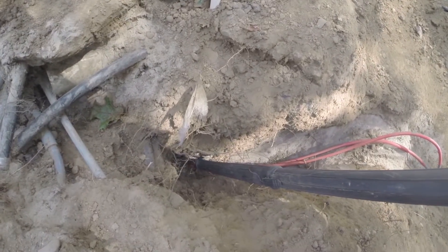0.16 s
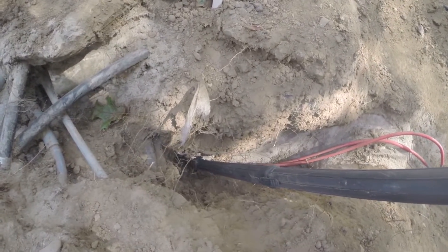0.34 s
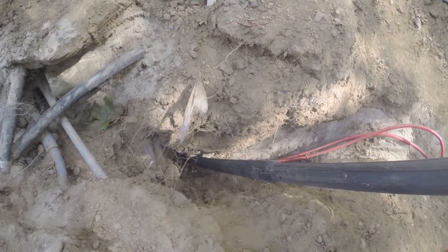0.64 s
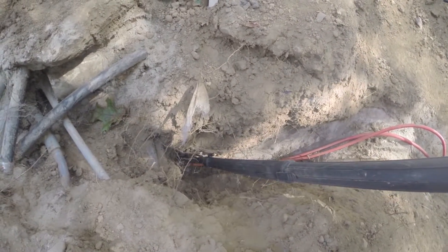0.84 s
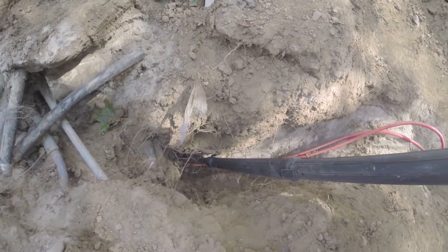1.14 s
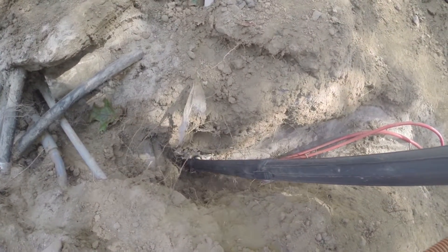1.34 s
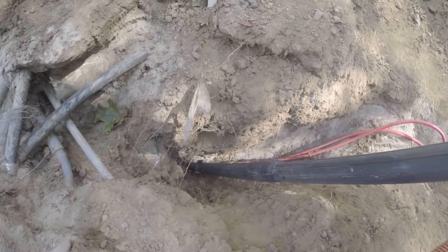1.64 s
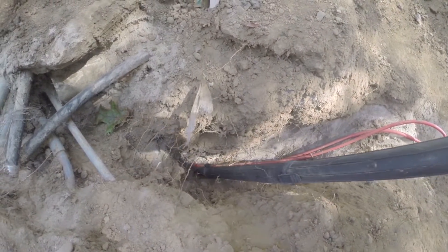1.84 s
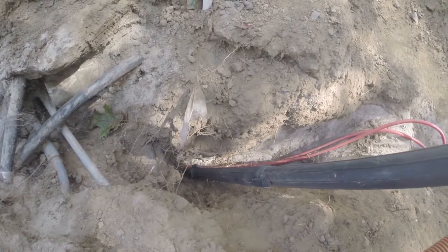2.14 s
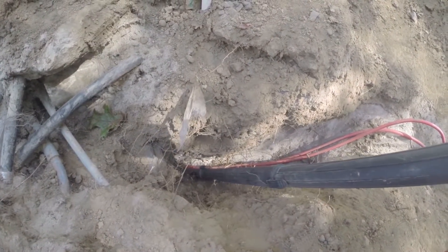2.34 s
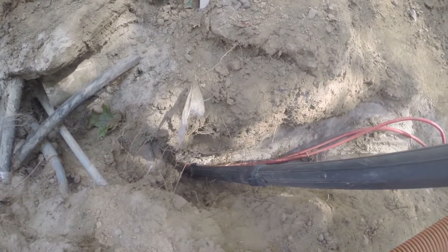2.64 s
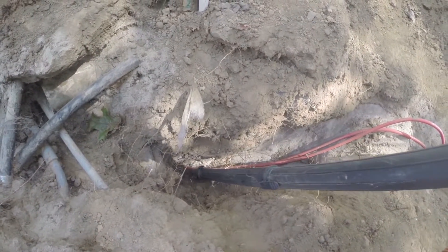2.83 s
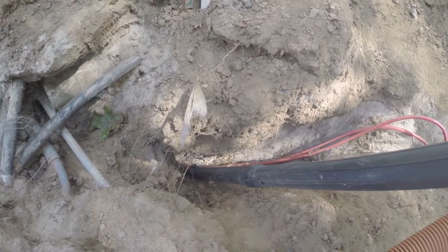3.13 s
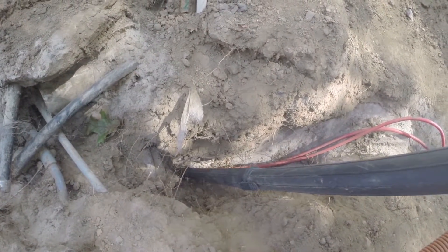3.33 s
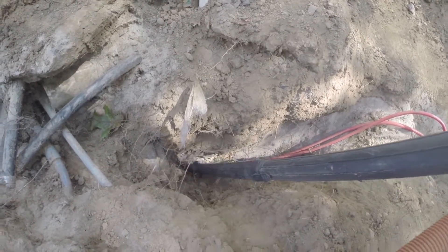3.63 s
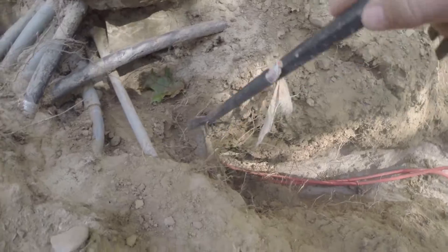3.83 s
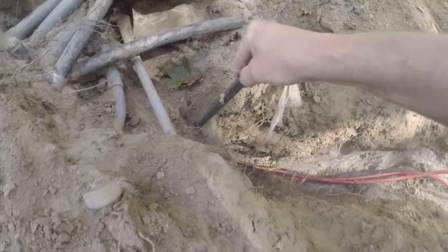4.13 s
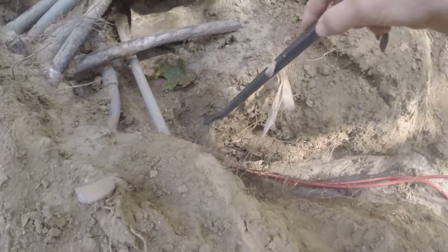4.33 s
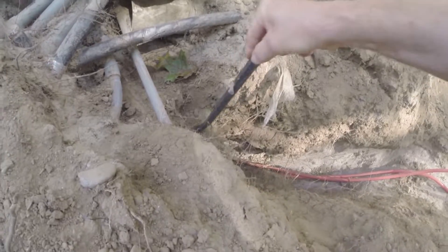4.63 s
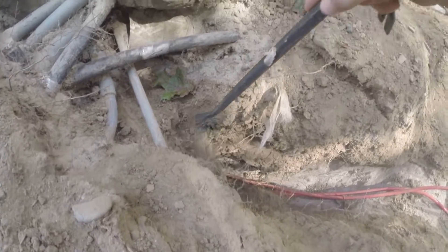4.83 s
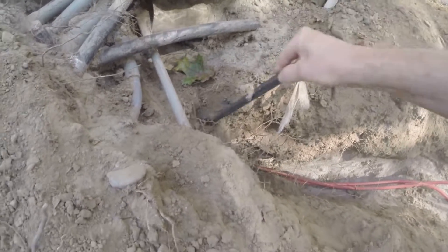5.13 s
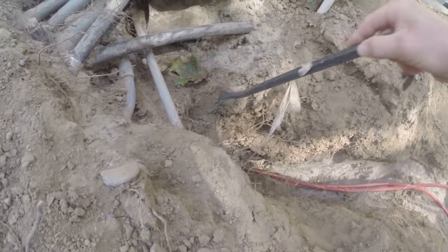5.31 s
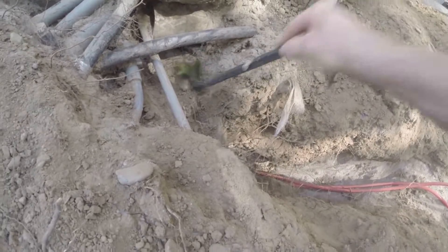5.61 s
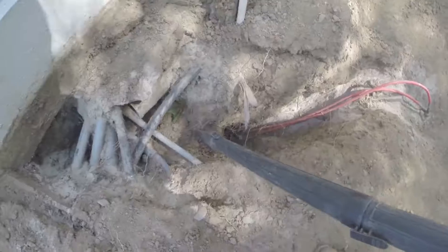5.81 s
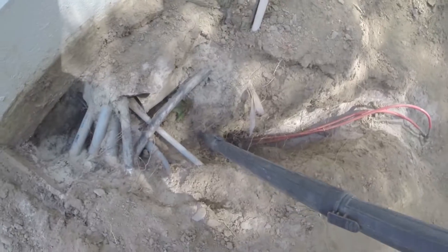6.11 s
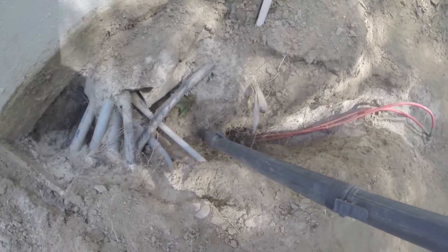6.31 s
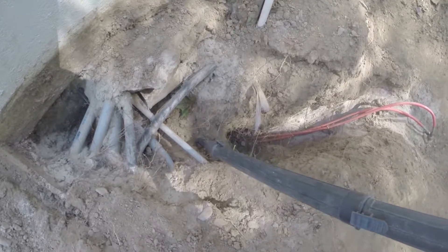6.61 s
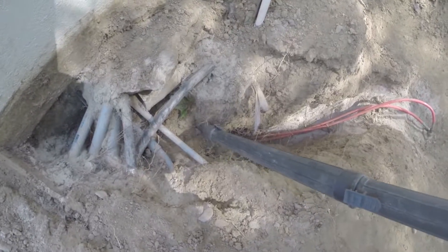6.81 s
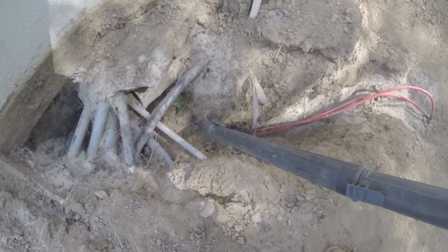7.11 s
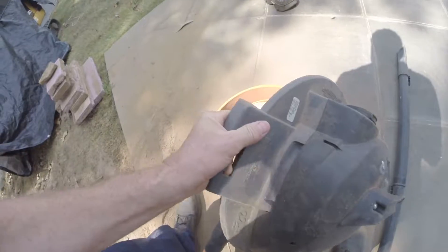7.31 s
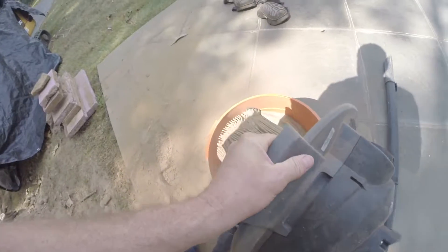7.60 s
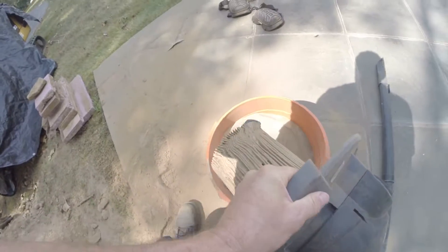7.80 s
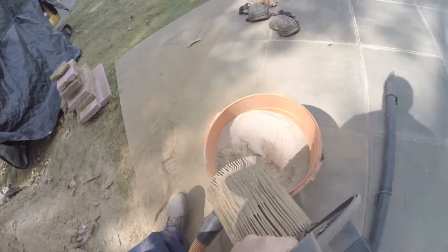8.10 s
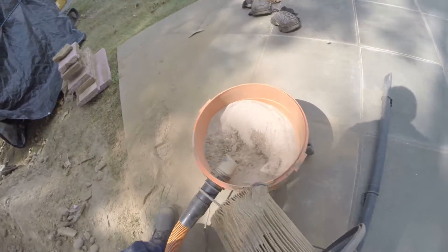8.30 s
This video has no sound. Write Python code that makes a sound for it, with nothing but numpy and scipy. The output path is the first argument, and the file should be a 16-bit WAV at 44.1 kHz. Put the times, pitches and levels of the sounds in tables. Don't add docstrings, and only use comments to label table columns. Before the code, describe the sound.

A shop vacuum whines steadily while grit and stones rattle up its tube, a steel bar chips soil, then plastic knocks and scrapes in quiet air.

```python
import sys
import numpy as np
from scipy import signal
from scipy.fft import rfft, irfft, next_fast_len
from scipy.io import wavfile
from scipy.ndimage import uniform_filter1d, map_coordinates

SR = 44100
rng = np.random.default_rng(int(sys.argv[2]) if len(sys.argv) > 2 else 0)


def volts_from_decibels(level):
    exponent = np.asarray(level, float) / 20
    return 10 ** exponent


def log_audio(samples):
    frames = np.atleast_2d(samples).T
    limited = np.clip(frames, -1, 1)
    pcm = np.round(limited * 32767).astype(np.int16)
    wavfile.write(sys.argv[1], SR, pcm)


N = 372689
T = np.arange(N) / SR

# start in seconds, end in seconds.
SPOTS_S = [
    (0, 3.7478),
    (3.7598, 5.8498),
    (5.8615, 7.2513),
]
# frequency in Hz, level in dB per Hz.
YARD_DB_PER_HZ = [(12, -30), (20, -8), (38, -9), (87, -10), (207, -13), (649, -34), (811, -31), (2540, -40),
                  (3350, -34), (12500, -51.5), (15500, -60)]
# frequency in Hz, gain in dB.
MIC_DB = [(20, -5), (7000, -0.5), (10000, -10), (15000, -24), (15600, -42)]


def running():
    # time in seconds, shaft speed in Hz, draw at the nozzle in dB.
    motor = [
        [(0.0, 530.4, -2.5), (0.06, 537.4, 0), (0.6, 538, -1), (0.84, 538.5, 1.5), (1.0, 539, -0.5),
         (1.46, 537, -1), (2.1, 537, 0), (2.38, 536.5, 2.5), (2.84, 538, 1), (2.93, 539.6, 2),
         (3.4, 544.5, -1.5)],
        [(3.95, 525.7, -0.5), (4.5, 525.7, -1), (5.1, 525.7, -0.5), (5.6, 525.7, -1.5)],
        [(6.1, 525.3, -6.5), (6.4, 529, 0), (6.69, 533, 1.5), (6.98, 533, -0.5), (7.16, 535, 1.5)],
    ]
    # whine in dB, hose rumble at rest in dB over the whine.
    level_db = [(-18, -19.5), (-17.5, -24.5), (-16, -16.5)]
    # frequency in Hz, level in dB per Hz.
    roar_db_per_hz = [
        [(90, -32), (150, -16), (470, -12.5), (1060, -7.5), (1700, -20), (2860, -34), (5000, -36.5),
         (6600, -25.5), (8000, -39), (10000, -52), (12000, -63), (15200, -69)],
        [(90, -76), (150, -24), (350, -4.5), (570, -11.5), (1020, -5), (1500, -18.5), (2900, -26.5),
         (5000, -29), (6600, -30), (8800, -35), (9500, -40), (11000, -43), (12000, -54.5), (15200, -64)],
        [(90, -67), (150, -21), (245, -0.5), (570, -6), (1150, 1), (1500, -16), (2310, -16), (3100, -25),
         (4600, -45), (6470, -27), (8000, -37), (9500, -41), (11500, -42), (15200, -65)],
    ]
    # casing resonance depth (1 is full), roar in dB, suction in dB, grit in grains per second, grit
    # in dB.
    place = [
        (0.602, -8.5, -6.5, 600, -8.5),
        (1, -5, -35, 10, -2),
        (1.1, -10, -5.5, 600, -7.5),
    ]
    # multiple of the shaft speed, level in dB over the whine.
    orders = [
        [(2, -15.5), (3, -36), (12, -27)],
        [(2, -12), (3, -20), (5, -31), (7, -30.5), (8, -31), (12, -30)],
        [(2, -21.5), (3, -34.5)],
    ]
    # frequency in Hz, width in Hz, gain in dB.
    local = [
        [(5610, 110, 4), (6480, 89, 4.5), (6790, 360, -7.5), (7110, 180, 6.5), (12600, 790, 5)],
        [(1810, 120, -5), (3270, 110, 5.5), (3600, 200, 2), (3800, 100, -2), (3955, 60, 6), (4950, 200, 0.5),
         (5680, 66, -1), (6020, 200, -1), (6480, 200, 3), (5620, 120, -4), (6800, 200, -3), (4750, 120, -4),
         (8930, 600, 2), (9600, 500, -8), (10700, 350, 6.5), (11600, 500, -5), (12300, 500, 2)],
        [(4100, 100, -1), (6480, 230, 4), (10540, 640, 6.5), (11700, 400, 3), (12800, 700, 5)],
    ]
    arm_share = [0, .47, 0]
    out = np.zeros(N)
    for (start_s, end_s), *spot in zip(SPOTS_S, motor, level_db, roar_db_per_hz, place, orders, local, arm_share):
        t = T[round(start_s * SR):round(end_s * SR)]
        fade = np.clip((t - start_s) / 0.009, 0, 1) ** 0.9 if start_s else 1
        add(out, start_s, fade * vacuum(t, *spot))
        add(out, end_s, volts_from_decibels(-21) * np.array([1, -1]))
    return out


def vacuum(t, motor, level_db, roar_db_per_hz, place, orders, local, arm_share):
    shaft_hz, draw_db = curves(motor, t)
    depth, roar_db, suck_db, grit_per_s, grit_db = place
    whine_db, rest_db = level_db
    mix = shaft(shaft_hz, draw_db, orders)
    mix = mix + fan(t, draw_db, roar_db, roar_db_per_hz, depth, local, arm_share)
    mix = mix + suction(draw_db, suck_db, grit_per_s, grit_db, local)
    mix = mix + hose(t, draw_db, rest_db)
    return volts_from_decibels(whine_db + ducking(t)) * mix


def shaft(shaft_hz, draw_db, orders):
    n = len(shaft_hz)
    turn = 2 * np.pi * np.cumsum(shaft_hz + 0.3 * wobble(25.4, n)) / SR
    whine = np.sqrt(2) * volts_from_decibels(0.07 * wobble(31.04, n) + 0.37 * wobble(4.54, n)) * np.cos(turn)
    for k, db in orders:
        yield_db = 1.9 * draw_db if k == 3 else 0
        sway_db = np.sqrt(k - 1) * (0.8 * wobble(16, n) + 0.9 * wobble(4, n))
        phase = round(k) * (turn + 0.04 * wobble(29.87, n))
        whine = whine + np.sqrt(2) * volts_from_decibels(db - yield_db + sway_db) * np.cos(phase)
    return whine


def fan(t, draw_db, roar_db, roar_db_per_hz, depth, local, arm_share):
    n = len(t)
    noise = patchy(n, patchy_db=0.75, drift_db=1.5)
    roar = mirrored(coloured(noise, roar_db_per_hz, depth, local), t, arm_share)
    return volts_from_decibels(roar_db - 0.8 * draw_db + 0.5 * wobble(7.57, n)) * roar


def suction(draw_db, suck_db, grit_per_s, grit_db, local):
    # frequency in Hz, level in dB per Hz.
    suck_db_per_hz = [(350, -17), (670, -0.5), (1170, 2), (1660, -10), (2160, -5), (2790, -13.5),
                      (3570, -10.5), (6580, -12.5), (7540, -17.5), (10400, -25.5), (12500, -37.5),
                      (15200, -41)]
    n = len(draw_db)
    hiss = patchy(n, patchy_db=1.57, drift_db=0.7) * volts_from_decibels(0.5 * wobble(90, n))
    grit = volts_from_decibels(grit_db + 0.57 * draw_db) * sand(n, grit_per_s)
    air = coloured(hiss + grit, suck_db_per_hz, 0.49, local)
    return volts_from_decibels(suck_db + draw_db + 0.067 * wobble(11.8, n)) * air


def hose(t, draw_db, rest_db):
    # frequency in Hz, level in dB per Hz.
    hose_db_per_hz = [(12, -46), (20, -9.5), (70, 0.5), (113, 2.5), (248, -8), (289, -29), (400, -6.5),
                      (520, -14.5), (880, -120)]
    # time in seconds, rumble in dB over the whine.
    clods = [(0.0, -31), (0.09, -18), (0.35, -9), (0.5, -10), (0.66, -12), (0.85, -10.5), (0.98, -10.5),
             (1.1, -16), (1.9, -17), (2.11, -10), (2.32, -14), (2.47, -10), (2.63, -6), (2.76, -8.5),
             (2.95, -15), (3.04, -3.5), (3.27, -7), (3.53, -16), (3.74, -9), (3.78, -18), (4.13, -15),
             (4.575, -20), (5.05, -15), (5.725, -16), (6.26, -7.5), (6.49, -7.5), (6.69, -9.5), (7.02, -10),
             (7.21, -19)]
    fall_db_per_s = 112
    clods_db = np.max([db - fall_db_per_s * np.abs(t - s) for s, db in clods], axis=0)
    rumble_db = np.maximum(rest_db + 1.3 * draw_db, clods_db)
    noise = rng.standard_normal(len(t)) * volts_from_decibels(2.1 * wobble(14, len(t)))
    return volts_from_decibels(rumble_db - 3.0) * coloured(noise, hose_db_per_hz)


def mirrored(x, t, share):
    # time in seconds, notch frequency in Hz.
    arm = [(3.76, 6700), (3.92, 6600), (4.2, 7000), (4.52, 7700), (4.7, 7300), (5.02, 8100), (5.2, 7250),
           (5.6, 7050), (5.85, 7450)]
    late = 6.5 * SR / curves(arm, t)[0]
    treble = filtered(x, lambda hz: np.exp(-((hz - 7200) / 1700) ** 4))
    return x + share * map_coordinates(treble, [np.arange(len(x)) - late])


def ducking(t):
    # time in seconds, depth in dB.
    ducks = [
        (0.1, 1),
        (3.76, 2),
        (4.565, 3),
        (5.74, 0.5),
        (5.86, 9),
        (6.473, 6.5),
        (6.82, 2),
    ]
    recover_s = 0.4
    since = [(t - s, depth_db) for s, depth_db in ducks]
    return -np.max([depth_db * np.exp(-np.abs(u) / recover_s) * (u >= 0) for u, depth_db in since], axis=0)


def wand():
    # time in seconds, peak in dB, pitch in Hz, T60 in seconds.
    stones = [(0.1002, -4.5, 3900, 0.013), (0.1328, -5, 4730, 0.0064), (0.6918, -4, 3530, 0.01),
              (0.8271, -16, 3080, .019), (0.8578, -10, 3360, 0.018), (1.0202, -4, 1950, 0.013),
              (1.163, -12, 5200, 0.018), (1.2291, -9.5, 3100, .008), (1.2342, -2, 2160, 0.0055),
              (1.7088, -7, 2340, 0.0086), (1.8626, -9, 2190, 0.017), (1.8752, -7, 9230, .01),
              (2.3365, -7, 3903, .01), (2.349, -9, 4000, .008), (2.3531, -8, 3700, .008),
              (2.407, -3, 2220, 0.0035), (2.519, -11, 11510, .008), (2.749, -10, 2500, .006),
              (2.9095, -3, 1900, 0.006), (2.9597, -1.5, 2580, 0.011), (2.9638, -5, 2800, .012),
              (2.969, -8.5, 3020, .014), (6.368, -8, 2100, .01), (6.4508, -3, 1926, 0.011),
              (6.4672, 2, 1300, 0.01), (6.4768, -1.5, 1650, 0.008), (6.5046, -9, 2160, 0.029),
              (6.5929, -11, 2080, 0.014), (6.6847, -11, 2170, .026), (6.7047, -2.5, 2030, 0.018),
              (6.74, -7, 2570, 0.0085), (6.781, -13, 9500, .006), (6.8435, -13, 10000, .008),
              (6.849, -10, 11000, .01), (6.8805, -6, 3430, 0.018), (6.886, -8, 3630, .02),
              (6.691, -12, 2070, .012), (6.514, -12, 2300, .012), (6.915, -12, 2300, .012)]
    # time in seconds, peak in dB, pitch in Hz.
    ticks = [(0.0234, -13, 3100), (0.072, -31, 10000), (0.0756, -28, 10300), (0.2149, -16, 3800),
             (0.2341, -18, 3400), (0.241, -33, 10300), (0.2743, -18, 3400), (0.2929, -29, 10700),
             (0.3089, -25, 10000), (0.3278, -9, 2100), (0.4145, -17, 2400), (0.4708, -31, 10000),
             (0.4863, -21, 10000), (0.7, -33, 10300), (0.7686, -9, 3100), (1.0011, -10, 5200),
             (1.0679, -17, 2800), (1.1252, -36, 10700), (1.2547, -19, 2800), (1.2678, -15, 7600),
             (1.2736, -31, 8600), (1.677, -37, 11700), (1.75, -12, 2400), (1.8196, -9, 4100),
             (1.9398, -37, 11400), (2.0293, -33, 10000), (2.1182, -17, 4100), (2.2308, -11, 5900),
             (2.2604, -11, 3800), (2.2902, -25, 10300), (2.341, -22, 8300), (2.3475, -14, 8300),
             (2.3595, -17, 8300), (2.3981, -17, 10000), (2.4284, -15, 3100), (2.4502, -34, 12100),
             (2.4952, -34, 11700), (2.5757, -29, 10300), (2.6412, -28, 10000), (2.7137, -28, 10300),
             (2.7698, -21, 8300), (2.7773, -21, 8300), (2.9723, -22, 8300), (3.0242, -7.5, 5200),
             (3.066, -23, 7610), (3.1028, -11, 4100), (3.389, -20, 9600), (3.432, -14, 4100),
             (6.4085, -20, 9600), (6.4201, -20, 7900), (6.4277, -23, 9300), (6.456, -20, 4100),
             (6.509, -15, 3100), (6.6508, -9, 2400), (6.926, -12, 2400), (7.091, -11, 5400),
             (7.135, -11, 5600), (7.24, -20, 4500)]
    # time in seconds, peak in dB, pitch in Hz.
    flicks = [(0.0235, -7, 5500), (0.108, -14, 5500), (0.3746, -11, 1200), (0.7014, -10, 1200),
              (2.016, -11, 1200), (2.041, -12, 1200), (2.428, -9, 1200), (0.1158, -16, 2900),
              (0.2988, -14, 2100), (0.4505, -21, 3400), (0.713, -12, 2100), (0.8271, -8, 5400),
              (0.8401, -15, 3500), (0.938, -16, 2100), (1.0172, -11, 5400), (1.058, -17, 3400),
              (1.075, -18, 3400), (1.136, -16, 2100), (1.175, -11, 5000), (1.3554, -16, 3495),
              (1.585, -15, 2100), (1.7894, -15, 4300), (1.9316, -13, 2300), (2.0947, -14, 3400),
              (2.0967, -9, 2100), (2.193, -12, 5500), (2.244, -15, 3200), (2.309, -14, 4870),
              (2.3536, -16, 2100), (2.444, -12, 1990), (2.4504, -13, 2100), (2.666, -10, 2100),
              (2.685, -14, 3500), (2.8296, -17, 3400), (2.9505, -14, 3200), (2.9782, -11, 2100),
              (3.034, -11, 3900), (3.1184, -13, 3500), (3.725, -14, 2104), (3.919, -15, 3220),
              (6.291, -16, 2100), (6.354, -18, 3400), (6.5825, -18, 3400), (6.676, -12, 2100),
              (6.7352, -11, 2800), (7.112, -11, 2100)]
    out = np.zeros(N)
    fall_db = 60 * np.arange(SR // 100) / SR / 0.006
    for s, db, hz, t60_s in stones:
        ring = ping(hz, t60_s, rough=1.5)
        ring = ring + volts_from_decibels(-7) * ping(min(1.6 * hz, 12000), 0.7 * t60_s, rough=3.0)
        ring = ring + volts_from_decibels(-9) * ping(0.62 * hz, 0.6 * t60_s, rough=2.5)
        add(out, s, volts_from_decibels(db - 3.5) * ring)
        burst_db = db - 18.0 + 5.4 * np.log2(hz / 2000) - fall_db
        add(out, s, volts_from_decibels(burst_db) * rng.standard_normal(len(fall_db)))
    for s, db, hz in flicks:
        add(out, s, volts_from_decibels(db - 11 - 2 * fall_db) * rng.standard_normal(len(fall_db)))
    out = through_mic(out)
    tick_t60_s = 0.0071
    for s, db, hz in ticks + flicks:
        ring = ping(hz, tick_t60_s, rough=1.3) + volts_from_decibels(-6) * ping(0.7 * hz, tick_t60_s, rough=2.4)
        add(out, s, volts_from_decibels(db - 4.5) * ring)
    return out


def bar():
    # time in seconds, peak in dB, pitch in Hz, T60 in seconds, thud in dB.
    blows = [(3.702, -14, 1570, 0.0078, -11), (3.723, -33, 260, 0.018, -46.5),
             (4.106, -6.5, 1100, 0.017, -19), (4.11, -16, 2190, 0.053, -40), (4.1, -15, 4700, 0.012, -30),
             (4.5572, -20, 750, .012, -42), (3.9, -14, 350, 0.015, -40), (4.558, -26, 9900, .01, -45),
             (4.5568, 1.5, 553, 0.0073, -21), (5.046, -34, 300, 0.022, -19),
             (5.7072, -6.5, 3520, 0.031, -18), (5.7105, -14, 1120, .03, -45), (5.717, -21, 5400, .04, -45),
             (5.705, -13, 11760, 0.034, -40), (5.706, -11.5, 6640, 0.045, -29),
             (5.705, -13.5, 1990, .03, -43), (5.7205, -15, 2050, .04, -24)]
    out = np.zeros(N)
    for s, db, hz, t60_s, thud_db in blows:
        add(out, s, volts_from_decibels(db) * ping(hz, t60_s, rough=hz / 4000))
        add(out, s + 0.0076, volts_from_decibels(thud_db) * ping(135, 0.027, rough=0.13))
    return through_mic(out)


def knocks():
    # time in seconds, peak in dB, boom in dB, click in dB, ring time as a multiple of the T60.
    hits = [(7.438, -38, -14, -12, .4), (7.465, -26, -10, -17, 0.48), (7.477, -33, -14, -19, .3),
            (7.484, -20, -21, -16, .35), (7.505, -38, -11, -18, .4), (7.523, -29, -10, -18, 0.45),
            (7.589, -33, -8, -18, .5), (7.614, -24, -15, -16, 0.63), (7.627, -31, -8, -22, .4),
            (7.6445, -8, -17, -21, .85), (7.6508, -23.5, 1.5, -34, 1.1), (7.654, -27, 1, -34, 1.4),
            (7.657, -15, -14, -26, 0.71), (7.672, -21, -12, -24, .5), (7.676, -17, -16, -26, .5),
            (7.681, -19, -9, -26, .6), (7.689, -25, -14, -24, .5), (7.899, -27, 6, 12, 0.38),
            (7.9028, -28, -6, 24, 0.68), (7.907, -29, -6, 20, .7), (7.911, -31, -8, 22, .6),
            (7.933, -34, -10, 22, .6), (7.9415, -30, -10, 24, .5), (7.951, -35, -14, 26, .6),
            (7.964, -19, -22, 3, 0.44), (8.26, -17, -18, 1, 0.3), (8.263, -27, -18, 4, .3),
            (8.29, -27, -22, -14, .6), (8.299, -25, -16, -14, .5), (8.328, -26, -18, -10, .5),
            (8.353, -20, -22, -12, .6), (8.3795, -15, -19, 1, .25), (8.383, -10, -19, -5, 0.41),
            (8.392, -11.5, -16, -12, 0.36), (8.401, -20, -20, 6, .4), (8.405, -21, -25, 9, .3),
            (8.421, -28, -16, -12, .4), (8.439, -35, -14, -5, .4)]
    # frequency in Hz, level in dB, T60 in seconds.
    bucket = [
        (317, 0, 0.076),
        (720, -8, 0.052),
        (973, 0, 0.049),
        (1050, -12, 0.045),
        (1650, -16, .03),
    ]
    out = np.zeros(N)
    boom_hz, _, boom_t60_s = bucket[0]
    for s, db, boom_db, click_db, free in hits:
        ring = volts_from_decibels(boom_db - 2.0) * ping(boom_hz, free * boom_t60_s, rough=0.09)
        for hz, mode_db, t60_s in bucket[1:]:
            ring = ring + volts_from_decibels(mode_db - 10.0 + rng.normal(0, 1.1)) * ping(hz, free * t60_s, rough=0.45)
        click = volts_from_decibels(click_db - 9.0) * ping(2270, 0.049 * free, rough=0.98)
        add(out, s, volts_from_decibels(db) * (ring + click))
    return through_mic(out)


def scraping():
    # frequency in Hz, level in dB per Hz.
    rub_db_per_hz = [(120, -40), (200, -8.5), (357, -9), (540, -9.5), (873, -4), (1100, -6), (1310, -13),
                     (2000, -32), (2600, -43), (4400, -120)]
    scrape_db_per_hz = [(710, -53), (1200, -8), (1360, -12.5), (1820, -5), (2030, -0.5), (2590, -10),
                        (3350, -6), (4880, -19.5), (5260, -19.5), (7410, -21.5), (8300, -26.5),
                        (15500, -51)]
    out, t = np.zeros(N), motor_off_s()
    n = len(t)
    rub_gain, scrape_gain = strokes(t)
    rub = coloured(rng.standard_normal(n) * volts_from_decibels(1.3 * wobble(160, n)), rub_db_per_hz)
    rasp = rng.standard_normal(n) * volts_from_decibels(1.6 * wobble(91.0, n)) + 0.75 * sand(n, 1800)
    scrape = coloured(rasp, scrape_db_per_hz, 0.15)
    add(out, t[0], rub_gain * rub + scrape_gain * scrape)
    return out


def strokes(t):
    # start in seconds, rise in seconds, hold in seconds, rub in dB, scrape in dB.
    hands = [(7.275, 0.21, .37, -52, -58), (7.56, 0.036, 0.11, -47.5, -59), (7.76, 0.042, 0.018, -49, -48),
             (7.8956, .003, 0.013, -51, -27), (7.903, 0.021, 0.043, -40.5, -28), (8.1, .12, .04, -56, -54),
             (7.8, 0.15, 0.39, -52.5, -60.5), (8.255, 0.04, .045, -39, -52),
             (8.257, .003, .005, -33.5, -37.5), (8.28, 0.066, 0.025, -37, -40),
             (8.35, 0.034, .022, -32, -34.5), (8.398, .02, .05, -45, -47)]
    lift_s = 0.012
    corners_db = 16.5 * np.array([-5.0, -0.6, 0, -0.08, -0.73, -1.5])
    power = 0
    for s, rise_s, hold_s, *db in hands:
        corners_s = s + np.cumsum([-rise_s / 2, rise_s / 2, rise_s, hold_s, lift_s, lift_s])
        shape_db = np.interp(t, corners_s, corners_db, -99, -99)
        power = power + volts_from_decibels(shape_db + np.reshape(db, (-1, 1))) ** 2
    return np.sqrt(power)


def yard():
    out, t = np.zeros(N), motor_off_s()
    air = patchy(len(t), patchy_db=2.5) + 0.2 * sand(len(t), 150)
    add(out, t[0], volts_from_decibels(-48.5) * coloured(air, YARD_DB_PER_HZ))
    return out


def motor_off_s():
    return T[T >= SPOTS_S[-1][1]]


def ping(hz, t60_s, rough):
    t = np.arange(SR // 8) / SR
    blur = 1 + rough * wobble(hz * 0.555, len(t))
    ring = np.sin(2 * np.pi * hz * t) * blur * volts_from_decibels(-60 * t / t60_s) * (1 - np.exp(-t * hz * 2.5))
    return -ring / np.abs(ring).max()


def sand(n, grains_per_s):
    at = np.flatnonzero(rng.random(n) < grains_per_s / SR * volts_from_decibels(7 * wobble(10, n)))
    u = rng.random((len(at), 2))
    hz = 1500 * 7.4 ** u[:, :1]
    size = volts_from_decibels(-4.5 * np.log(u[:, 1:] + 0.14)) * np.sqrt(hz)
    cycles = hz * np.arange(256) / SR
    grains = size * np.sin(2 * np.pi * cycles) * np.exp(-cycles / 0.88)
    index = at[:, None] + np.arange(256)
    return unit(np.bincount(index.ravel(), grains.ravel(), n + 256)[:n])


def patchy(size, patchy_db, drift_db=0):
    z = signal.stft(rng.standard_normal(size + 512), nperseg=512)[2]

    def field(bins, frames):
        across = uniform_filter1d(rng.standard_normal(z.shape), bins, 0)
        return unit(uniform_filter1d(across, frames, 1))

    gain_db = patchy_db * field(8, 6) + drift_db * field(3, 40)
    return signal.istft(z * volts_from_decibels(gain_db), nperseg=512)[1][:size]


def coloured(x, points, depth=0, local=()):
    # frequency in Hz, width in Hz, gain in dB.
    case = [(338, 99, -1.5), (538, 235, -10.5), (950, 130, 1.5), (1083, 450, -6), (1300, 110, -2),
            (1687, 196, -8), (1993, 80, 8), (2256, 180, 4.5), (2840, 720, -5.5), (3590, 210, 4.5),
            (4010, 160, -6.5), (4230, 200, 5), (4640, 210, -9.5), (4760, 290, 7), (5496, 660, 11),
            (5700, 87, -6), (5990, 180, -6), (6380, 140, 9), (6790, 250, 9), (9770, 430, -5),
            (10300, 300, 0), (10600, 520, -4.5)]

    def peaks_db(modes, hz):
        return sum(db / (1 + (2 * (hz - centre) / width) ** 2) for centre, width, db in modes)

    return unit(filtered(x, lambda hz: volts_from_decibels(along(points, hz) + depth * peaks_db(case, hz) + peaks_db(local, hz))))


def through_mic(x):
    return filtered(x, lambda hz: volts_from_decibels(along(MIC_DB, hz)))


def filtered(x, gain):
    m = next_fast_len(len(x) + 8192)
    return irfft(rfft(x, m) * gain(np.fft.rfftfreq(m, 1 / SR)), m)[:len(x)]


def along(points, hz):
    f, v = np.transpose(points)
    return np.interp(np.log(hz + 1), np.log(f + 1), v)


def curves(rows, t):
    s, *cols = np.transpose(rows)
    return [np.interp(t, s, c) for c in cols]


def wobble(rate_hz, size):
    knots = rng.standard_normal(int(size * rate_hz / SR) + 4)
    return map_coordinates(knots, [np.arange(size) * rate_hz / SR])


def unit(x):
    return x / np.sqrt(np.mean(x ** 2) + 1e-20)


def add(out, s, sound):
    part = out[round(s * SR):][:len(sound)]
    part += sound[:len(part)]


def scene():
    hush = volts_from_decibels(-72) * coloured(rng.standard_normal(N), YARD_DB_PER_HZ)
    return (running() + wand() + bar() + knocks() + scraping() + yard() + hush)[None]


def low_pass(x):
    return signal.sosfilt(signal.butter(12, 15310, fs=SR, output="sos"), x)


def record(dry):
    soft = dry / (1 + np.abs(dry / 0.97) ** 6) ** (1 / 6)
    mix = filtered(soft[0], lambda hz: np.clip((15600 - hz) / 300, 0, 1))[None]
    return low_pass(mix)


dry = scene()
out = record(dry)
log_audio(out)
```